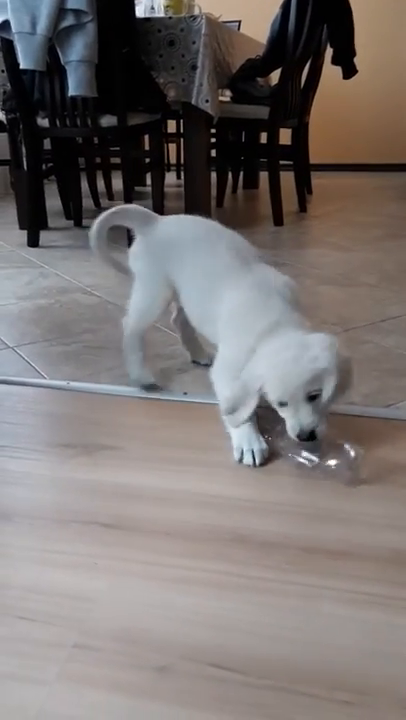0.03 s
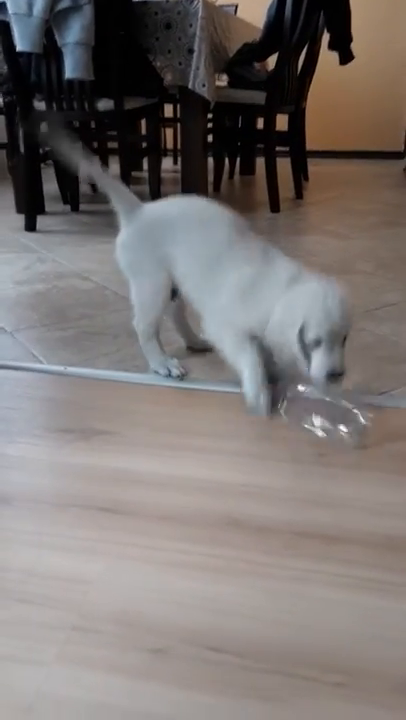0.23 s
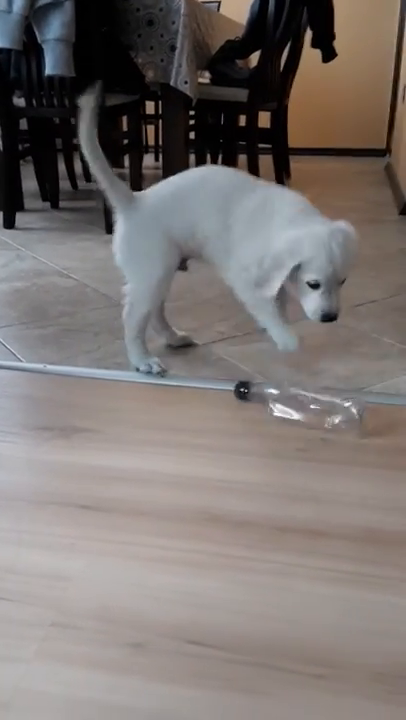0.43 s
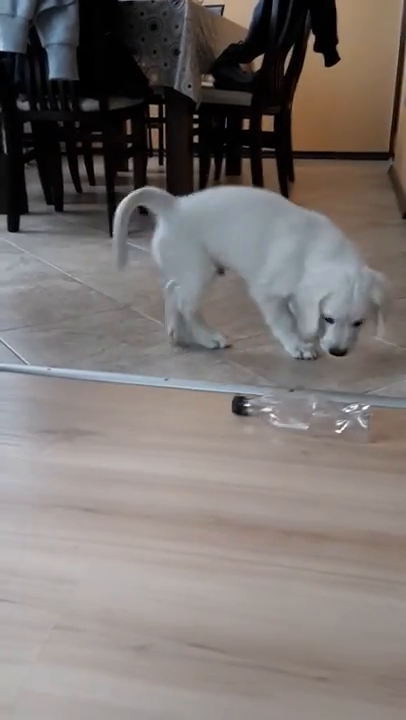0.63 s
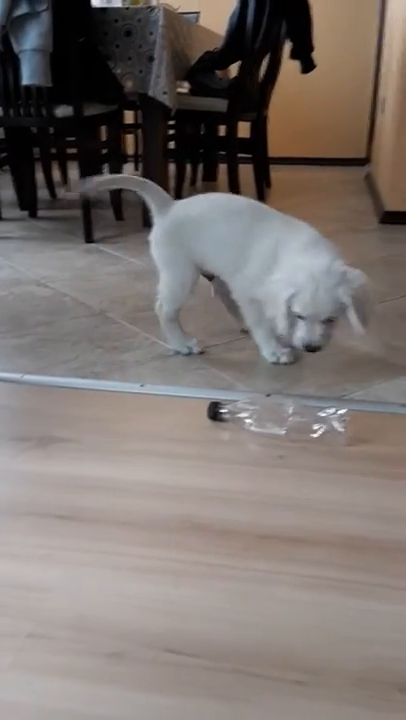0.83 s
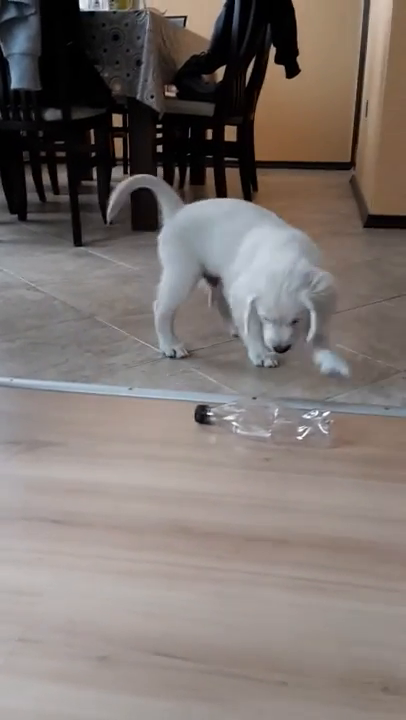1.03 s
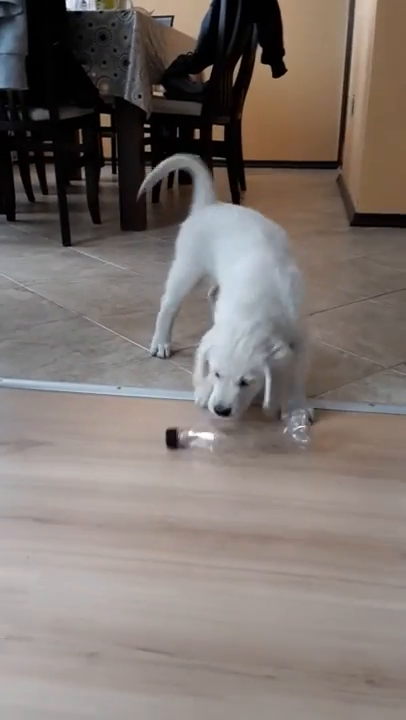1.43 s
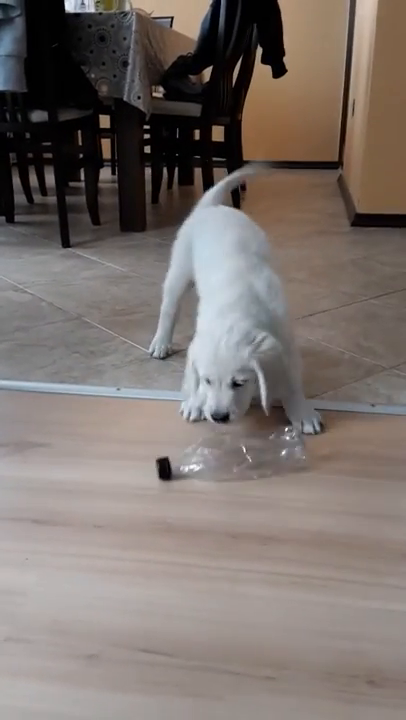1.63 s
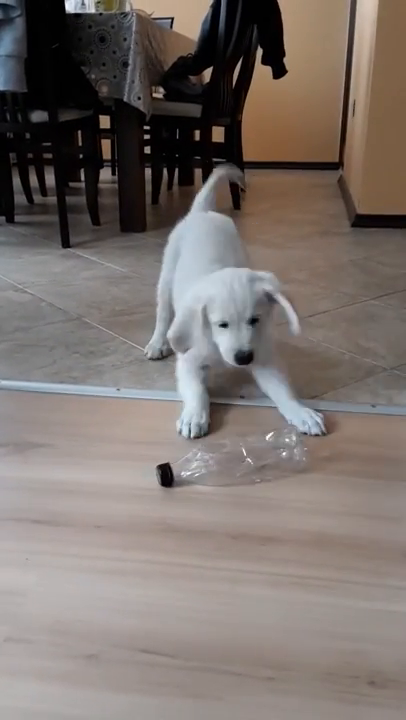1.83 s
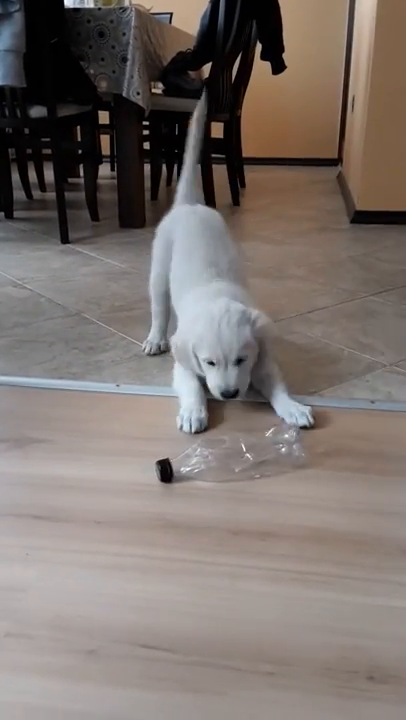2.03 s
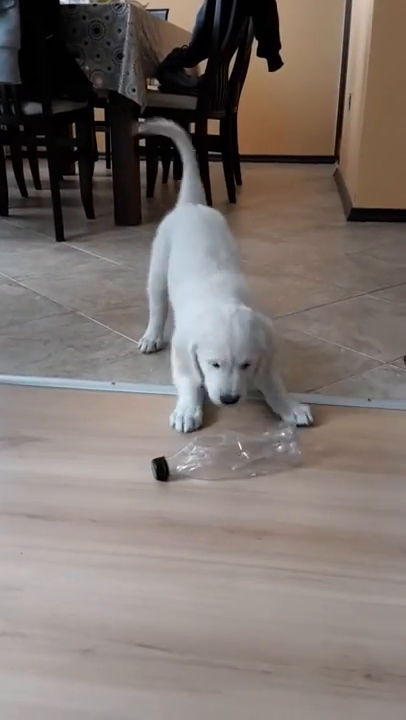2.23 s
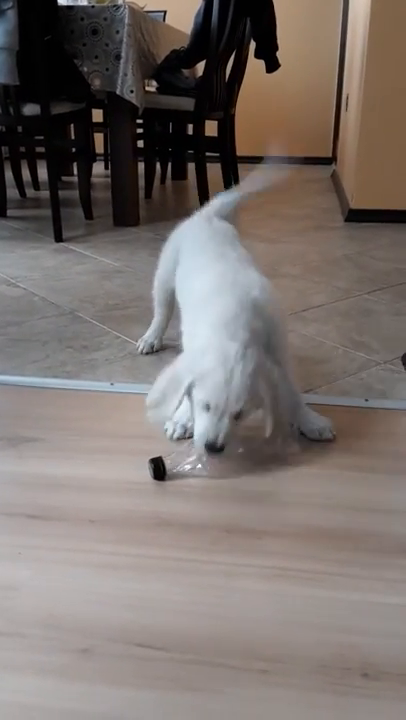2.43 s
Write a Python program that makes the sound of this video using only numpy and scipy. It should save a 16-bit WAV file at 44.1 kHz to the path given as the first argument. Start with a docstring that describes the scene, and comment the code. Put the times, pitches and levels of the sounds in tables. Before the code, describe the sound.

An empty plastic bottle scrapes, then bounces with a hollow clatter as a puppy paws it over a hard floor. After a pause it is knocked again and rolls briefly. A nearby phone picks up room echo and soft thumps.

```python
"""A faint scrape grows into a hollow clatter: a puppy paws an empty plastic bottle over a hard floor.
The bottle flips, bounces on wall and cap, and is later nudged and rolls a little. Each knock rings its
thin shell, broad side panel and the air inside, with a bright tick; sliding ribs shake shell and panel.
The dining room rings on, and soft thumps, low rumble and a faint hum lie below. It is all heard from a
phone close by, with the bottle muffled on the right."""
import sys
import numpy as np
from scipy import signal
from scipy.fft import rfft, irfft
from scipy.io import wavfile

SR = 44100
rng = np.random.default_rng(int(sys.argv[2]) if len(sys.argv) > 2 else 0)


def unload_audio(sound):
    """Save the sound as a 16-bit wav file, at the path given as the first command line argument."""
    columns = np.transpose(np.atleast_2d(sound))
    # keep every value between -1 and 1, then stretch to whole-number steps
    steps = np.round(np.clip(columns, -1, 1) * 32767)
    wavfile.write(sys.argv[1], SR, steps.astype(np.int16))


N = 110250

# The bottle sliding and rolling. Each row: time in seconds, rub fader in dB, scratch fader in dB.
SLIDE_FADERS = [(0, -53, -67), (.05, -51, -69.5), (.09, -44, -61.5), (.13, -58.5, -61), (.19, -41.5, -65.5),
                (.26, -39, -58), (.35, -38.5, -62.5), (.405, -34, -34), (.45, -44, -60), (.60, -33, -45),
                (.67, -32, -53), (.73, -34.5, -61), (.78, -57, -54.5), (.86, -73, -86.5), (1.0, -94, -82),
                (1.2, -84.5, -84), (1.27, -83, -80), (1.42, -87.5, -71), (1.46, -45.5, -57.5),
                (1.53, -53, -66), (1.62, -46.5, -56.5), (1.67, -30.5, -53.5), (1.73, -35.5, -59.5),
                (1.80, -46, -63.5), (1.85, -62, -63.5), (1.89, -76.5, -59), (1.97, -91, -75.5),
                (2.1, -95, -97.5), (2.38, -96, -87.5), (2.5, -91, -73.5)]
# Rub sent to the panel, under the paw and then rolling free. Each row: time in seconds, send in dB.
PANEL_SEND = [(.1, -3), (.3, -8), (.7, -9.5), (1.5, -15), (1.7, -7.5)]
# Body of the rub, and the bright scratch above it. Each row: frequency in Hz, gain in dB.
RUB_EQ = [(100, -1.5), (300, 3), (480, 2), (750, 2.5), (1100, -1.5), (1700, -9.5), (2500, -8),
          (4300, -22.5), (6000, -29.5), (16000, -21)]
SCRATCH_EQ = [(1000, -26), (2400, -16), (4000, -18.5), (5500, -41), (8300, -45), (10000, -10.5),
              (11300, 4.5), (12300, -5.5), (14500, -18), (16000, -35)]
# Resonances of the thin shell, the side panel and the air inside.
# Each row: pitch in Hz, relative level in dB, time to fall 60 dB in seconds.
SHELL_MODES = [(355.8, -4, 0.074), (436.3, -11.5, 0.074), (759.5, 1, 0.03), (892, -2, 0.082),
               (974, -13.5, 0.18), (1008, -0.5, 0.017), (1206, -1.5, 0.02), (1281, -3, 0.031),
               (1500, -8, .025), (1610, -2.5, 0.087), (1965, -5, 0.012), (2323, -5.5, 0.039)]
PANEL_MODES = [(648.7, 0, 0.057), (718, -4, 0.071), (708, -6, 0.057)]
AIR_MODES = [(243.2, 0.0086, 0.3), (292, 0, 0.16)]
# Rumble and hiss of the house, and their extra tint on the right. Each row: frequency in Hz, gain in dB.
HOUSE_EQ = [(20, -15.5), (50, -1.5), (90, -0.5), (170, -5), (300, -8.5), (450, -15.5), (650, -27),
            (1100, -36), (1800, -38), (2350, -27.5), (3100, -42), (6000, -55.5), (9000, -56.5),
            (11300, -43), (15000, -53.5)]
HOUSE_RIGHT_EQ = [(40, 7), (100, 3.5), (250, -6.5), (500, -3.5), (1000, 2.5), (2350, -4.5), (4000, 2),
                  (12000, 5)]
# Level rides of the house noise and of the hum. Each row: time in seconds, level in dB.
HOUSE_FADER = [(0, -51), (.85, -54), (1.3, -56), (1.8, -53), (2.15, -60.5), (2.5, -60)]
HUM_FADER = [(0, -56), (.85, -52), (1.3, -55.5), (1.5, -60.5), (2.5, -67)]
# The bottle's knocks. Each row: start in seconds, shell gain in dB, contact brightness as a cutoff in Hz,
# panel gain in dB, inside air gain in dB, tick gain in dB.
KNOCK_CUES = [(.056, -37, 910, -22.5, -23.5, -52.5), (.141, -40, 883, -20.5, -32.5, -47),
              (.170, -29.5, 1830, -21, -30.5, -38.5), (.210, -22, 1380, -13, -31.5, -24),
              (.276, -18.5, 2043, -17, -36, -32.5), (.3676, -12, 3800, -14.5, -19, 4.5),
              (.3715, -15, 2820, -2, -23.5, -6), (.3803, -19.5, 3500, -17, -34, -2),
              (.4518, 0.5, 1540, -22, -2.5, -7), (.4955, -5, 1910, -35, -26, -12),
              (.5230, -1, 1726, -20, -13, -3), (.5695, -4, 3710, -10.5, -27, 1),
              (.5800, -2, 1395, -3, -18.5, -12.5), (.6285, -4, 1090, -10.5, -75, -27),
              (.6545, -9, 2160, -4, -27, -13), (.708, -23, 1500, -14, -34.5, -23),
              (1.453, -40.5, 1104, -21.5, -29, -40), (1.6342, -5.5, 1130, -23.5, -22, -24),
              (1.647, -16, 1300, -43.5, -43, -41), (1.6868, -24.5, 1100, -18, -24, -22)]
# Colour of the shell's crack and of the tick. Each row: frequency in Hz, gain in dB.
CRACK_EQ = [(60, -33.5), (120, -11.5), (200, -3), (330, -3.5), (500, -5), (800, 0), (1300, 4), (2200, 0),
            (3200, -10.5), (4800, -18), (7000, -52.5), (16000, -38)]
TICK_EQ = [(1000, -26.5), (2400, -12.5), (3300, -19), (5000, -23.5), (7500, -26.5), (9700, -10.5),
           (11300, 4), (12300, -1.5), (14500, -13.5), (16000, -24)]
# Soft low thumps. Each row: start in seconds, pitch in Hz, time to fall 60 dB in seconds,
# left gain in dB, right gain in dB.
THUMP_CUES = [(0.133, 77, 0.043, -73, -28), (0.22, 82, 0.13, -69, -35), (0.2535, 169, 0.022, -58, -14),
              (.256, 78, .15, -81, -28), (.385, 83, .09, -66, -34.5), (0.457, 85, 0.11, -69, -35),
              (0.571, 81.7, .12, -47, -40), (1.039, 91, 0.071, -66.5, -46), (1.494, 94, 0.059, -64, -33),
              (1.604, 119.6, 0.042, -45.5, -31), (2.019, 95, 0.052, -55, -31.5),
              (2.369, 150.5, 0.028, -41, -40)]
# Colour of the buckling shell and of the small tap. Each row: frequency in Hz, gain in dB.
CRUNCH_EQ = [(300, -28), (1000, -2), (2200, -3.5), (3300, -9.5), (5000, -21), (8000, -17), (16000, -22.5)]
TAP_EQ = [(100, -3), (700, 11), (1400, -11.5), (3000, -13), (6000, -49), (16000, -54)]
# Length of the room's reverb. Each row: frequency in Hz, time to fall 60 dB in seconds.
REVERB_DECAY = [(150, 0.44), (500, 0.53), (1200, 0.35), (3000, 0.72), (12000, .56)]
# Colour of the reverb, and of the bottle at the right microphone. Each row: frequency in Hz, gain in dB.
REVERB_EQ = [(100, -2.5), (300, 0), (700, -2), (1500, -1.5), (3000, -2.5), (4500, 4.5), (7500, 0.5),
             (12000, -5)]
MUFFLED_EQ = [(100, -10), (200, -13), (300, -18), (500, -34), (650, -18), (850, -16), (1100, -18),
              (2200, -23), (4500, -10.5), (7000, -17.5), (11300, -19.5), (15000, -17)]

SHELL_DB, PANEL_DB, AIR_DB, CRACK_DB, TICK_DB = -22, -14.5, -23, 6.5, -4.5
CATCHES_PER_S, SCRATCHES_PER_S, GRAIN_SPREAD_DB, RUB_DB = 600, 4200, 3.5, -1.5
CRACK_T60_S, TICK_T60_S, SNAP_DECAY_S, SNAP_DB = 0.044, .04, .0005, -1.5
FLICK_DB, FLICK_LOW_CUT_HZ, SLAP_DELAY_S, SLAP_DB = -8, 450, 0.0034, -12.5
PANEL_DETUNE = 0.015  # relative spread of the panel's pitch from blow to blow
HUM_HZ, HUM_WAVER_HZ = 169.4, 8.3
REVERB_DB, PREDELAY_S, REVERB_BUILD_S = -2.5, 0.0034, 0.0077
RIGHT_DIRECT_DB, RIGHT_SLIDE_DB = -7.5, 4.5


def undb(db):
    """Decibels to gain."""
    return 10 ** (np.asarray(db) / 20)


def unit_rms(x):
    """Scale to rms 1."""
    return x / np.sqrt(np.mean(x ** 2))


def unit_energy(x):
    """Scale to a total energy of 1."""
    return x / np.linalg.norm(x)


def seconds(length):
    """Time axis."""
    return np.arange(int(length * SR)) / SR


def over_hz(points, hz):
    """Read (Hz, value) points on a log-frequency axis."""
    freqs, values = np.array(points).T
    return np.interp(np.log(hz + 1e-9), np.log(freqs), values)


def fader(table, column=1):
    """Gain over time from a dB column."""
    rows = np.array(table)
    return undb(np.interp(np.arange(N) / SR, rows[:, 0], rows[:, column]))


def ring(x, response):
    """Play x through an impulse response."""
    return signal.oaconvolve(x, response)[:len(x)]


def eq(x, points, size=2048):
    """Minimum-phase equaliser through (Hz, dB) points."""
    gain = undb(over_hz(points, np.arange(size // 2 + 1) * SR / size))
    cepstrum = irfft(np.log(gain))
    cepstrum[1:size // 2] *= 2
    cepstrum[size // 2 + 1:] = 0
    return ring(x, irfft(np.exp(rfft(cepstrum))))


def soften(x, hz):
    """Two-pole low-pass."""
    return signal.sosfilt(signal.butter(2, min(hz, SR / 2 - 1), fs=SR, output="sos"), x)


def fade(t, t60):
    """Exponential decay, 60 dB down at t60."""
    return np.exp(-np.log(1000) * t / t60)


def modes(table, pitch=1):
    """A struck resonator: decaying sines of alternating polarity."""
    t = seconds(.5)
    return sum(undb(db) * np.sin(2 * np.pi * hz * pitch * t) * fade(t, t60) * (-1) ** k
               for k, (hz, db, t60) in enumerate(table))


def burst(envelope, points):
    """A shaped, coloured noise burst of unit energy."""
    return unit_energy(eq(rng.choice([-1., 1.], len(envelope)) * envelope, points))


def grains(per_s):
    """Randomly timed clicks of uneven size."""
    clicks = (rng.random(N) < per_s / SR) * rng.choice([-1, 1], N)
    return clicks * undb(GRAIN_SPREAD_DB * rng.standard_normal(N))


def add(out, start, sound):
    """Mix a sound in at a time in seconds."""
    i = int(start * SR)
    out[..., i:i + sound.shape[-1]] += sound[..., :N - i]


def shell_ring():
    """The thin shell rings in its modes, with a noisy crack that is new each time."""
    crack = burst(fade(seconds(.5), CRACK_T60_S), CRACK_EQ)
    return undb(SHELL_DB) * modes(SHELL_MODES) + undb(CRACK_DB) * crack


def slide():
    """The bottle's ribs catch on the floor and shake shell and panel; fine scratches hiss above."""
    shell = eq(shell_ring(), RUB_EQ)
    panel = undb(PANEL_DB) * modes(PANEL_MODES)
    catches = unit_rms(grains(CATCHES_PER_S)) * fader(SLIDE_FADERS) / np.linalg.norm(shell)
    rub = ring(catches, shell) + ring(catches * fader(PANEL_SEND), panel)
    scratch = unit_rms(eq(grains(SCRATCHES_PER_S), SCRATCH_EQ))
    return undb(RUB_DB) * rub + scratch * fader(SLIDE_FADERS, column=2)


def house_tone():
    """A bed of low rumble and faint hiss from the house, with a wavering hum on the left."""
    left, right = (unit_rms(eq(rng.standard_normal(N), HOUSE_EQ)) * fader(HOUSE_FADER) for _ in range(2))
    waver = unit_rms(soften(rng.standard_normal(N), HUM_WAVER_HZ))
    phase = 2 * np.pi * HUM_HZ * np.arange(N) / SR + 0.2 * waver
    hum = np.sin(phase) * (1 + 0.33 * waver) * fader(HUM_FADER)
    return np.array([left + hum, eq(right, HOUSE_RIGHT_EQ)])


def knocks():
    """Each blow flicks the bottle's wall inward, rings shell, panel and air, and ticks on top."""
    out, t = np.zeros(N), seconds(.5)
    air = undb(AIR_DB) * modes(AIR_MODES)
    low_cut = signal.butter(1, FLICK_LOW_CUT_HZ, "high", fs=SR, output="sos")
    click = eq(signal.unit_impulse(len(t)), CRACK_EQ)
    flick = undb(FLICK_DB) * unit_energy(signal.sosfilt(low_cut, click))
    tick_envelope = fade(t, TICK_T60_S) + undb(SNAP_DB) * np.exp(-t / SNAP_DECAY_S)
    for start, shell_db, cutoff_hz, panel_db, air_db, tick_db in KNOCK_CUES:
        shell = undb(shell_db) * soften(shell_ring() + flick, cutoff_hz)
        panel_pitch = 1 + PANEL_DETUNE * rng.standard_normal()
        panel = undb(PANEL_DB + panel_db) * modes(PANEL_MODES, panel_pitch)
        slap = soften(burst(fade(t, CRACK_T60_S / 2), CRACK_EQ), cutoff_hz)
        tick = undb(TICK_DB + tick_db) * burst(tick_envelope, TICK_EQ)
        add(out, start, shell + panel + undb(air_db) * air + tick)
        # the wall slaps the floor again just after the knock
        add(out, start + SLAP_DELAY_S, undb(shell_db + CRACK_DB + SLAP_DB) * slap)
    return out


def thumps(attack_s=0.0041):
    """Dull bumps of paws and of the hand on the phone: low, damped sines with a rounded attack."""
    out, t = np.zeros((2, N)), seconds(.5)
    for start, hz, t60, left_db, right_db in THUMP_CUES:
        bump = 2 * np.sin(2 * np.pi * hz * t) * fade(t, t60) * (1 - np.exp(-t / attack_s))
        add(out, start, undb([[left_db], [right_db]]) * bump)
    return out


def crunch(start_s=0.42, length_s=.07, gain_db=-41.5, snaps_per_s=900):
    """The shell springs back from the paw in a short, fading run of tiny buckling snaps."""
    progress = (np.arange(N) / SR - start_s) / length_s
    envelope = (progress > 0) * np.sqrt(np.clip(1 - progress, 0, 1))
    snaps = unit_rms(eq(grains(snaps_per_s), CRUNCH_EQ))
    return undb(gain_db) * snaps * envelope


def tap(start_s=1.4995, left_db=-51.5, right_db=-48, t60_s=0.38):
    """One small, soft tap: a puff of midrange noise that dies away."""
    out, t = np.zeros((2, N)), seconds(.5)
    puff = unit_rms(eq(rng.standard_normal(len(t)), TAP_EQ)) * fade(t, t60_s)
    add(out, start_s, undb([[left_db], [right_db]]) * puff)
    return out


def room_reverb(x):
    """Hard walls return a diffuse tail that dies at its own rate in each octave."""
    t = seconds(1)
    spectrum = rfft(rng.standard_normal(len(t)))
    hz = np.arange(len(spectrum)) * SR / len(t)
    octaves_hz = 125 * 2. ** np.arange(8)
    tail = np.zeros(len(t))
    for centre_hz, solo in zip(octaves_hz, np.eye(len(octaves_hz))):
        band_gain = over_hz(list(zip(octaves_hz, solo)), hz)
        tail += irfft(spectrum * band_gain, len(t)) * fade(t, over_hz(REVERB_DECAY, centre_hz))
    tail *= np.clip((t - PREDELAY_S) / REVERB_BUILD_S, 0, 1)
    return ring(x, undb(REVERB_DB) * eq(unit_energy(tail), REVERB_EQ))


def scene():
    """The left microphone faces the bottle; the muffled right one hears mostly the room."""
    hits, sliding = knocks() + crunch(), slide()
    near = hits + sliding
    far = hits + undb(RIGHT_SLIDE_DB) * sliding
    left = near + room_reverb(near)
    right = eq(undb(RIGHT_DIRECT_DB) * far + room_reverb(far), MUFFLED_EQ)
    return np.array([left, right]) + thumps() + tap() + house_tone()


def record(dry):
    """The phone cuts the top end steeply above 14.7 kHz."""
    return signal.sosfilt(signal.ellip(10, .2, 70, 14700, fs=SR, output="sos"), dry)


dry = scene()
out = record(dry)
unload_audio(out)
```